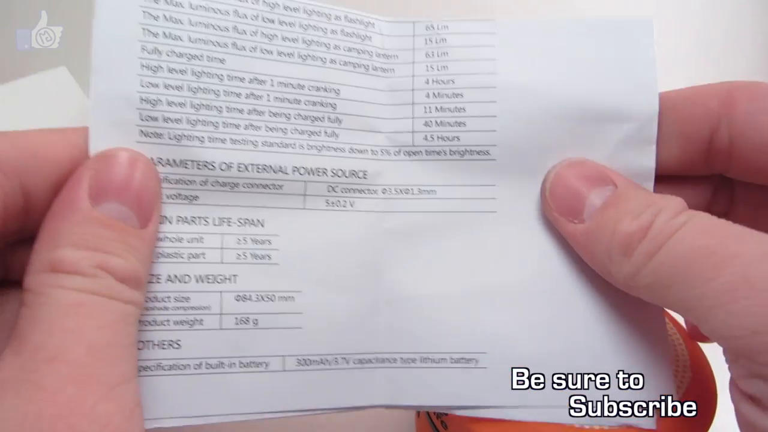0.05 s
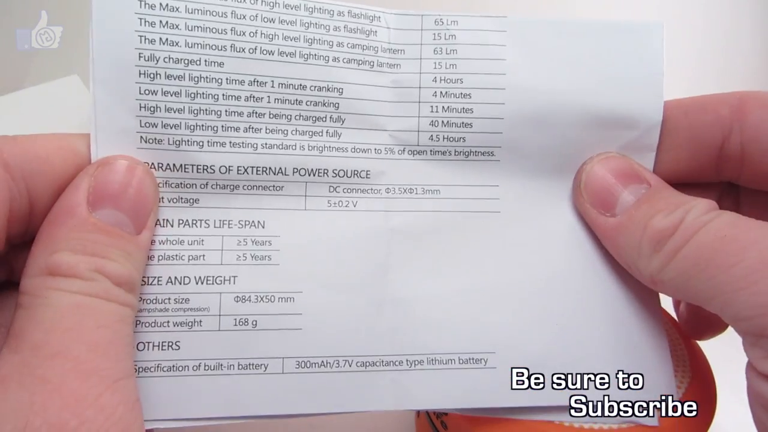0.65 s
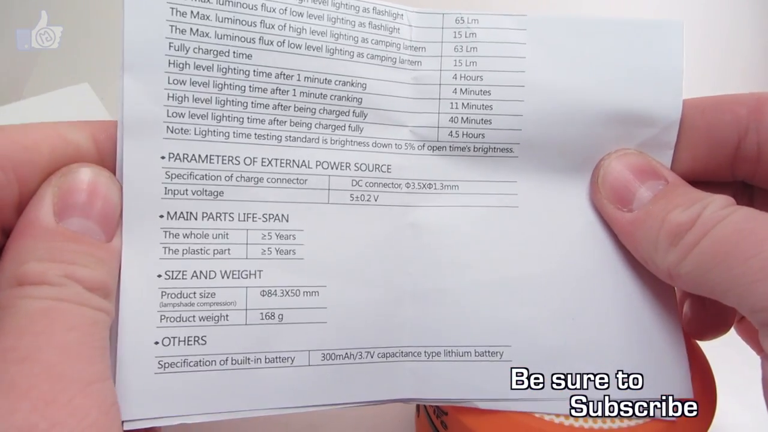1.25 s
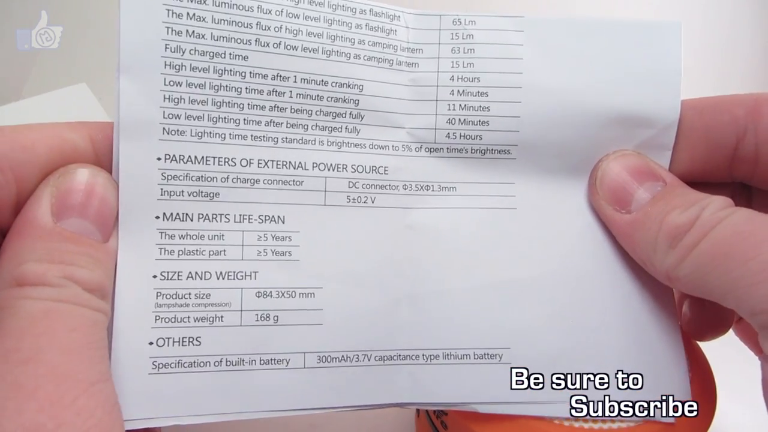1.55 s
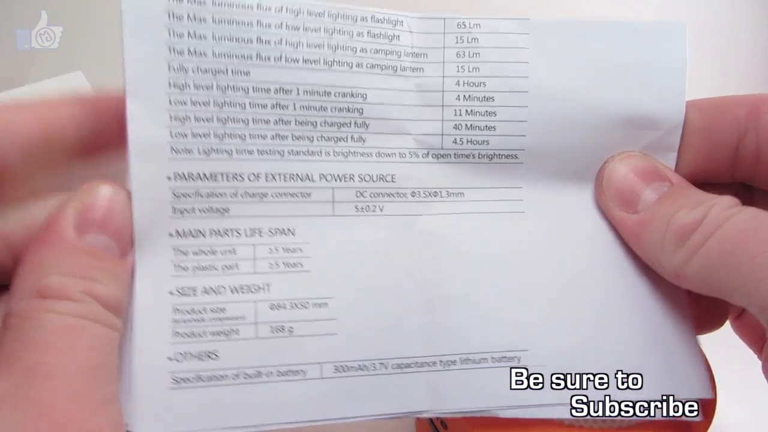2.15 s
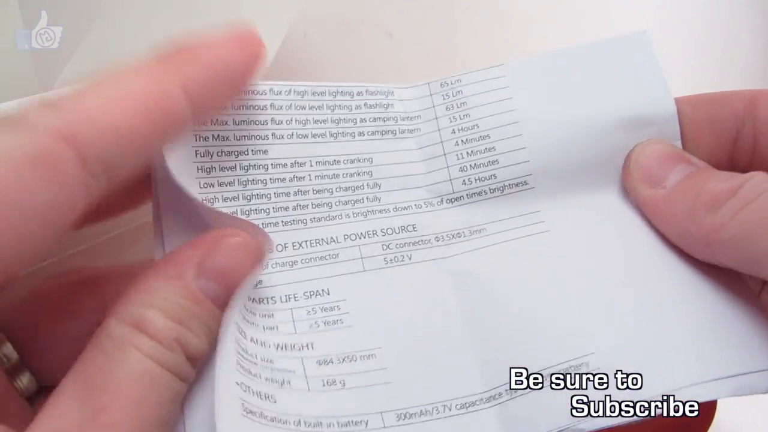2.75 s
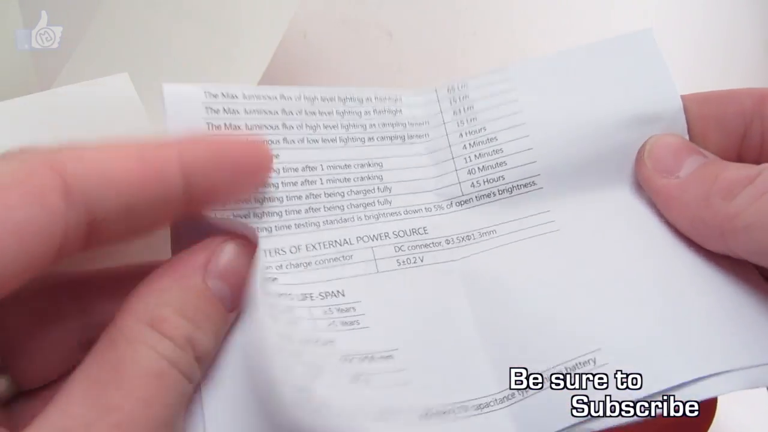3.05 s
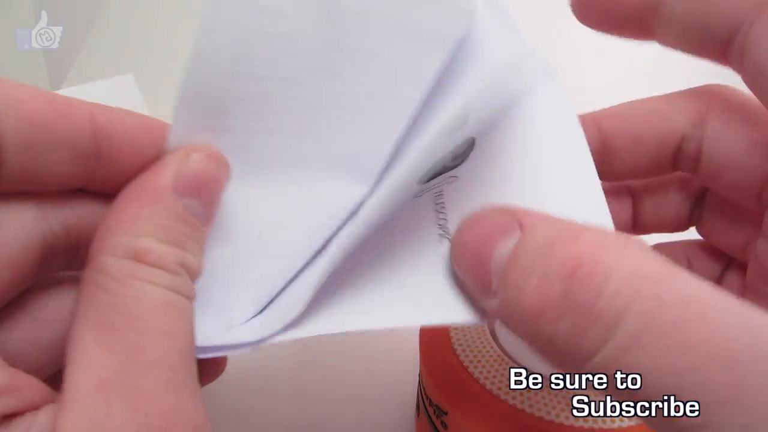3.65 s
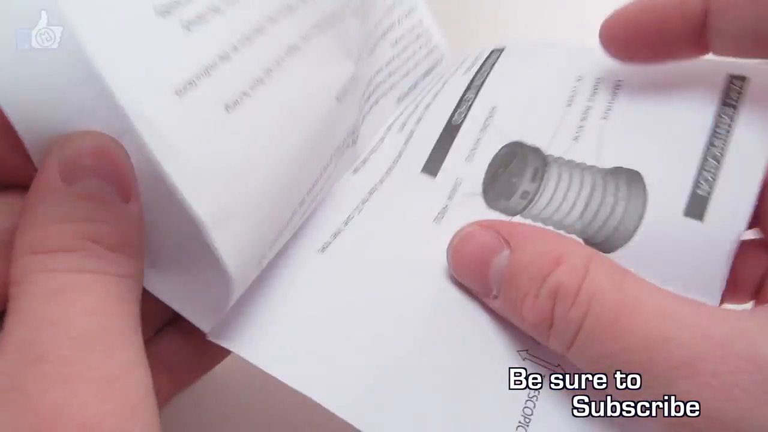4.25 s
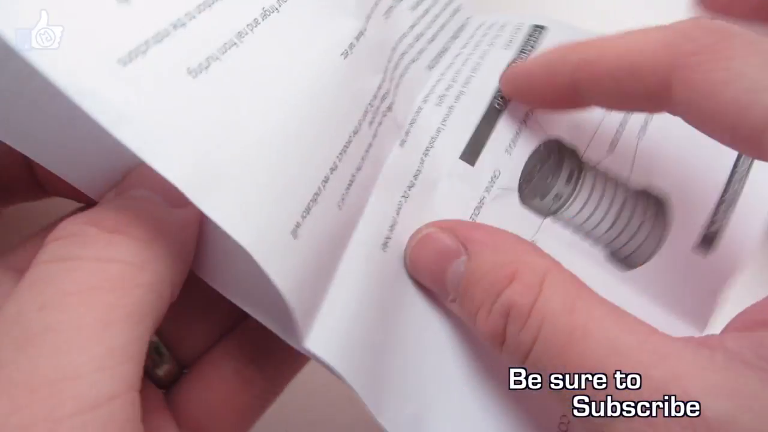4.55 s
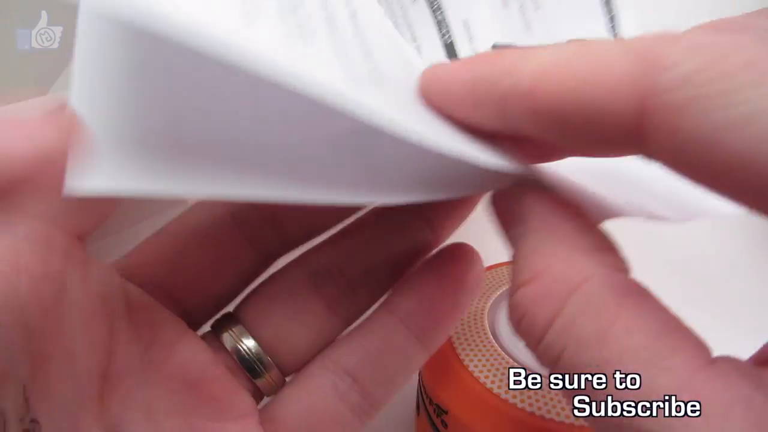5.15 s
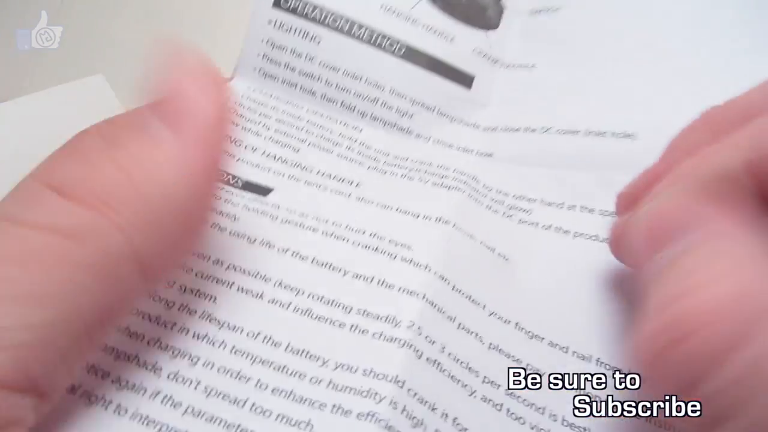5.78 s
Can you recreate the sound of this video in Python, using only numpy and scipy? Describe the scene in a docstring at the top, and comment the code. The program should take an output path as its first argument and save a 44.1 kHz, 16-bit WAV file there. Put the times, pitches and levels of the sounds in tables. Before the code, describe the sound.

Close paper handling: a few faint ticks, then busy crackling and sliding as a folded sheet is unfolded and flipped.

```python
"""A quiet room, close to the microphone: a folded paper leaflet is held, opened out and turned over by hand.
Creases buckle with sharp snaps and fingers touch softly. Each hand movement slides and crinkles layers
of paper that catch on each other, and now and then the sheet flaps, pushing air with a soft thump.
The room returns a faint tail and one late echo over a soft, steady hush."""
import sys
import numpy as np
from scipy import signal
from scipy.fft import rfft, irfft, next_fast_len
from scipy.io import wavfile

SR = 44100
rng = np.random.default_rng(int(sys.argv[2]) if len(sys.argv) > 2 else 0)


def inscribe(sig):
    """Save sig as 16-bit PCM at rate SR to the path in sys.argv[1].

    A 1-D sig is mono; a 2-D sig holds one channel per row.
    Samples are clipped to [-1, 1] before scaling.
    """
    pcm = np.round(np.clip(np.atleast_2d(sig).T, -1, 1) * 32767)
    wavfile.write(sys.argv[1], SR, pcm.astype(np.int16))


N = 261072
TIME = np.arange(N) / SR
FILTER_SIZE = 2048
HZ = np.maximum(np.fft.rfftfreq(FILTER_SIZE, 1 / SR), 1)
BODY_EDGE_HZ, SHEEN_EDGE_HZ = 1700, 6000   # three paper bands: body below, crack between, sheen above
MEDIUM_RUB_DB = -37

# Snaps, touches and catches: t/s, crack level/dB, sheen re crack/dB, panel ring f/Hz, decay/s
PAPER_TRANSIENTS = [(0.02, -43.5, -22, 1100, 0.0052), (0.0584, -34, -18, 2000, 0.00054),
                    (0.233, -47.5, 0, 575, 0.0068), (0.3641, -48.5, 3, 390, 0.0056),
                    (0.4013, -41.5, -5, 1210, 0.00073), (0.6114, -34, -20, 1380, 0.0021),
                    (0.894, -34, -0.5, 1150, .0039), (0.929, -38, -3, 646, 0.011),
                    (0.9404, -29, -10, 580, .0027), (0.9471, -30.5, -37, 1740, .0026),
                    (0.9593, -36, -3, 900, 0.0052), (1.008, -34, -2.5, 840, 0.0083),
                    (1.0498, -41, 3.5, 443, 0.0077), (1.181, -44, -16, 1100, 0.0019),
                    (1.1856, -26, -12, 1300, 0.0023), (1.47, -43, -7.5, 2120, 0.0015),
                    (1.5378, -39, -1.5, 2170, .0029), (1.7364, -40.5, -6, 2060, 0.003),
                    (1.9122, -49.5, -2, 594, 0.0052), (1.9317, -43.5, -4, 2040, .0026),
                    (1.9695, -32.5, -2, 6230, 0.0024), (2.062, -33, 0, 5870, 0.0039),
                    (2.126, -39, -5, 5300, 0.0029), (2.1943, -34, 3.5, 5600, 0.0017),
                    (2.2929, -37, -3, 1300, 0.0062), (2.3009, -22.5, 2, 1400, 0.0048),
                    (2.4, -43, -2, 790, .003), (2.4232, -32.5, -3, 2440, 0.0089),
                    (2.4962, -35.5, 1.5, 1290, 0.03), (2.6063, -15.5, -8, 3650, 0.0017),
                    (2.612, -20.5, 2, 5530, 0.0048), (2.7926, -38.5, -15, 1080, 0.0019),
                    (2.962, -37.5, -5, 636, 0.0049), (3.1143, -27, 6, 5330, 0.0022),
                    (3.1255, -25.5, -1, 1110, 0.0053), (3.2916, -19.5, -2, 5400, 0.0016),
                    (3.5532, -27.5, -22, 2630, .0046), (3.5677, -19.5, -26, 2130, 0.0032),
                    (3.5984, -21, -8.5, 3120, .0042), (3.671, -14, -4.5, 2920, 0.002),
                    (3.6929, -15.5, -3, 2880, 0.0015), (3.7238, -20.5, -1.5, 4450, 0.0051),
                    (3.7887, -33.5, -7, 3400, 0.0023), (4.002, -34, -2.5, 5130, 0.01),
                    (4.165, -34.5, 0, 1700, 0.0065), (4.2988, -30.5, -5.5, 654, 0.0016),
                    (4.3363, -29.5, -29, 1700, 0.002), (4.3542, -36, -12, 3000, 0.0063),
                    (4.3892, -19.5, -10, 1180, 0.0046), (4.4022, -17, -1.5, 4400, 0.0037),
                    (4.639, -33.5, -34, 2980, 0.0029), (4.6464, -33.5, -3, 1260, 0.0032),
                    (4.8399, -35, -15, 600, 0.009), (4.9293, -20.5, -15, 770, 0.0045),
                    (5.0117, -38, -18, 3000, 0.0031), (5.059, -32, -24, 3480, 0.005),
                    (5.0795, -22, -1, 3740, 0.0023), (5.1464, -28, -21, 2778, .0056),
                    (5.1575, -35.5, -30, 1760, 0.0022), (5.208, -36.5, -7, 850, 0.0072),
                    (5.2526, -32.5, -43, 945, 0.0035), (5.3664, -25.5, -4, 660, 0.0078),
                    (5.5948, -29, -2.5, 640, .0043), (5.621, -19.5, -7, 1420, .002),
                    (5.7034, -23.5, -2.5, 985, 0.0048), (5.7377, -39, -9, 440, 0.014)]
def transients():
    """Short paper sounds: sharp crease snaps, soft finger touches and brief catches as a stroke begins."""
    out = np.zeros((2, N))
    for s, db, sheen_db, ring_hz, decay_s in PAPER_TRANSIENTS:
        hit = paper_hit(db, sheen_db, ring_hz, decay_s)
        add(out, s, left_right(hit, pan_db=-1.8, width_db=-0.5))
    return out


def paper_hit(db, sheen_db, ring_hz, decay_s, kick=0.21, tail_db=-24, tail_s=0.0079, leak_hz=260):
    """The paper takes one kick; bending waves scatter over the sheet and quickly die."""
    t = TIME[:2 * FILTER_SIZE]
    # Hard hits are crisper; larger, lower panels have more body.
    body_db = 2.5 - 0.37 * max(db + 33, 0) + 3 * np.log2(1320 / ring_hz)
    ring_db = 8.5 - 0.23 * sheen_db   # a dull hit is a hollow pop
    panel = resonance(ring_hz, 0.4 * ring_hz, ring_db)
    leak = HZ / np.hypot(HZ, leak_hz)   # bass escapes round the edge
    voices = paper_voices(panel * leak * bent_sheet(ripple_db=3))
    sound = 0
    for voice, band_db, stretch in zip(voices, (body_db, 0, sheen_db), (1.1, 1.0, 0.9)):
        envelope = np.exp(-t / (decay_s * stretch)) + from_db(tail_db) * np.exp(-t / tail_s)
        force = fibre_slips(len(t), uneven_db=3) * envelope
        force[0, 0] = kick * np.linalg.norm(force[0])
        sound = sound + radiate(force, voice) * from_db(db + band_db)
    return sound * np.sqrt(SR / 100)   # the energy of 10 ms at that level


# Hand strokes: start t/s, fastest t/s, end t/s, crack level/dB, sheen re crack/dB
HAND_STROKES = [(0.0, 0.029, 0.09, -46.5, 4.5), (0.096, 0.074, 0.18, -54.5, 2.5),
                (0.243, 0.33, 0.33, -48, -1.5), (0.932, 0.95, 0.975, -40, -14),
                (1.047, 1.12, 1.148, -39.5, -0.5), (1.472, 1.482, 1.56, -53.5, -12),
                (2.205, 2.23, 2.34, -37, -0.5), (2.31, 2.34, 2.45, -44, -6), (2.5, 2.583, 2.72, -35.5, -3),
                (2.753, 2.75, 2.78, -41, 1.5), (2.822, 2.827, 2.87, -35, -3.5),
                (2.883, 2.955, 3.0, -34, -2.5), (3.055, 3.176, 3.195, -30, 2),
                (3.164, 3.22, 3.27, -39, -1.5), (3.263, 3.299, 3.425, -33, -4.5),
                (3.462, 3.517, 3.68, -32.5, -2), (3.825, 3.858, 3.895, -46.5, -11),
                (3.932, 3.925, 4.0, -56, 6), (4.012, 4.09, 4.09, -44, -2.5),
                (4.113, 4.106, 4.24, -41.5, -3.5), (4.227, 4.28, 4.38, -38.5, -6.5),
                (4.433, 4.474, 4.515, -39.5, -4.5), (4.53, 4.67, 4.68, -49, -0.5),
                (4.732, 4.766, 4.94, -40.5, -5), (4.84, 4.91, 4.945, -33.5, -2.5),
                (4.94, 5.107, 5.115, -37, -2), (5.13, 5.134, 5.29, -40.5, -5.5),
                (5.293, 5.324, 5.58, -36, -3), (5.56, 5.69, 5.71, -37, 0), (5.714, 5.743, 5.92, -53, 1)]
def hand_strokes(attack_s=0.013, release_s=0.0095, swell_db=6.5):
    """Body, crack and sheen envelopes: each stroke swells to its fastest moment, slackens and stops."""
    power = np.zeros((3, N))
    for start, fastest, end, db, sheen_db in HAND_STROKES:
        slack = np.interp(TIME, [start, fastest, end], [1, 0, 1])
        fade = np.maximum(start - TIME, 0) / attack_s + np.maximum(TIME - end, 0) / release_s
        envelope = from_db(db - swell_db * slack) * np.exp(-np.minimum(fade, 20))
        body_db = -2 - 0.2 * (db - MEDIUM_RUB_DB)   # slower rubbing has more body
        power += np.outer(from_db([body_db, 0, sheen_db]) ** 2, envelope ** 2)
    return np.sqrt(power)


# Top lift that makes rubbing airier than snapping: f/Hz, level/dB
RUB_LIFT = [(8000, 0), (12000, 3), (15500, 3.5)]
def slide(strength, judder_db=1.7, judder_hz=170, ticks_per_s=100, tick_db=2.5, tick_s=0.0013,
          shape_s=0.07):
    """Friction on a bending sheet: fibres slip under a juddering grip while tiny wrinkles tick."""
    grip = from_db(judder_db * drift(judder_hz))
    triggers = rng.random(N) < ticks_per_s / SR
    ticks = triggers * from_db(tick_db * np.minimum(rng.exponential(1, N), 3) - tick_db)
    wrinkles = signal.lfilter([1], [1, -np.exp(-1 / (tick_s * SR))], ticks + 1e-18)
    forces = [rms_one(fibre_slips(N, uneven_db=3) * (grip + tick_share * wrinkles)) * gain
              for gain, tick_share in zip(strength, (3.0, 0.95, 0.7))]
    out, step = np.zeros((2, N)), round(shape_s * SR)
    crossfade = np.hanning(2 * step)
    for at in range(-step, N, step):   # one shape of the sheet melts into the next
        start, end = max(at, 0), min(at + 2 * step, N)
        rub_db = 20 * np.log10(strength[1, start:end].max() + 1e-9)
        lightness_db = np.clip(MEDIUM_RUB_DB - rub_db, -10, 10)
        lift = gain_curve(RUB_LIFT) ** (1 + 0.11 * lightness_db)   # a light touch is airier
        for force, voice in zip(forces, paper_voices(bent_sheet(ripple_db=4) * lift)):
            piece = force[:, start:end] * crossfade[start - at:end - at]
            response = np.array(voice) / np.linalg.norm(voice[0])
            add(out, start / SR, signal.fftconvolve(piece, response, axes=1))
    return left_right(out, pan_db=-1.56, width_db=0.5)


# Edges catching: centre t/s, swell width/s, crack level/dB, body re crack/dB, sheen re crack/dB
EDGE_SCUFFS = [(0.201, 0.0043, -48, 4.5, 3.5), (1.133, 0.0049, -41, -4, 8), (1.144, 0.0024, -36, -3.5, 5.5),
               (2.455, 0.0067, -23.5, -5.5, -9), (2.582, 0.0044, -23, -3, 7.5),
               (2.625, 0.0051, -25, -16, -4), (3.288, 0.0057, -27, -8, -5), (3.566, 0.0037, -27, 3, -6),
               (3.6644, 0.0042, -20.5, -3, -1), (4.0627, 0.0034, -22.5, -5, -10.5),
               (4.29, 0.0025, -23.5, -1, -16), (5.321, 0.0091, -32, -6.5, 2), (5.381, 0.011, -30, -2, -29),
               (5.678, 0.0052, -22.5, -16, -11.5)]
def scuffs():
    """An edge catches and drags: a quick run of slips that swells and fades."""
    out, t = np.zeros((2, N)), TIME[:4 * FILTER_SIZE]
    centre_s = t[-1] / 2
    for s, width_s, db, body_db, sheen_db in EDGE_SCUFFS:
        swell = 1 / np.cosh(np.minimum(np.abs(t - centre_s) / width_s, 20))
        voices = paper_voices(bent_sheet(ripple_db=2.5) * gain_curve(RUB_LIFT))
        for voice, band_db in zip(voices, (body_db, 0, sheen_db)):
            force = fibre_slips(len(t), uneven_db=2) * swell
            sound = radiate(force, voice) * np.linalg.norm(swell)
            add(out, s - centre_s, left_right(sound * from_db(db + band_db)))
    return out


def crinkles(strength, count=170, below_rub_db=8, scatter_db=8):
    """Small creases give way at random, louder the harder the paper is rubbed."""
    out = np.zeros((2, N))
    for k, (jitter, size, octaves) in enumerate(rng.uniform(-1, 1, (count, 3))):
        at = int((k + 0.5 + 0.5 * jitter) * (N - 1) / count)
        rub_db = 20 * np.log10(strength[1, at] + 1e-9)
        db = rub_db - below_rub_db + scatter_db * size
        crinkle = paper_hit(db, sheen_db=-1, ring_hz=2200 * 2 ** octaves, decay_s=0.0055)
        add(out, at / SR, left_right(crinkle))
    return out


# Thumps of the whole sheet: t/s, level before trim/dB, f/Hz
SHEET_FLAPS = [(1.012, -32, 220), (2.3, -29, 190), (2.411, -38, 130), (3.112, -36, 195), (3.269, -19, 179),
               (3.666, -27, 188)]
def flaps(rise_s=0.0017, wobble=0.5, trim_db=-2, leak_hz=110):
    """The sheet pushes a puff of air in a few uneven swings; the deepest air flows round its edge."""
    out, t = np.zeros((2, N)), TIME[:2 * FILTER_SIZE]
    leak = signal.butter(2, leak_hz, "high", fs=SR, output="sos")
    envelope = t / rise_s * np.exp(1 - t / rise_s)
    for s, db, hz in SHEET_FLAPS:
        lowpass = signal.butter(2, 2 * hz, fs=SR, output="sos")
        air = signal.sosfilt(lowpass, rng.standard_normal((2, len(t))))
        swing = np.sin(2 * np.pi * hz * t) + wobble * rms_one(air)
        add(out, s, from_db(db + trim_db) * signal.sosfilt(leak, swing * envelope))
    return out


def fibre_slips(size, uneven_db):
    """Two dense streams of tiny slips of uneven strength, for mid and side."""
    return rng.standard_normal((2, size)) * from_db(uneven_db * np.minimum(rng.exponential(1, size), 6))


# Broad tone of the paper: f/Hz, relative level/dB
PAPER_TONE = [(25, -24.5), (50, -15.5), (130, -21.5), (330, -8.5), (550, -6.5), (800, -3.5), (960, -13.5),
              (1300, -6.5), (1830, -8.5), (2300, 2.5), (5500, 1), (8000, -2.5), (12000, -12.5),
              (15800, -23)]
# Stereo width of the paper: f/Hz, side re mid/dB
PAPER_WIDTH = [(40, -1), (150, 6.5), (600, -24.5), (3000, -12), (7000, -8), (11000, -3.5), (15000, 0.5)]
def paper_voices(shape):
    """Mid and side impulse responses of the sheet in one shape, for body, crack and sheen."""
    above_body, above_crack = (1 / (1 + (edge / HZ) ** 10) for edge in (BODY_EDGE_HZ, SHEEN_EDGE_HZ))
    bands = (1 - above_body, above_body * (1 - above_crack), above_crack)
    colour = gain_curve(PAPER_TONE) * shared_colour() * shape
    gains = [colour * np.sqrt(band) for band in bands]
    return [(causal(gain), causal(gain * gain_curve(PAPER_WIDTH))) for gain in gains]


def bent_sheet(ripple_db, spacing_hz=260, even_above_hz=7000):
    """Each bend gives the sheet its own peaks and dips, which even out in the treble."""
    knots = rng.standard_normal(FILTER_SIZE)
    depth_db = ripple_db / (1 + (HZ / even_above_hz) ** 4)
    return from_db(depth_db * np.interp(HZ / spacing_hz, np.arange(len(knots)), knots))


def radiate(force, voice):
    """The sheet turns a force into mid and side sound; the mid has energy 1."""
    sound = np.array([through(drive, response) for drive, response in zip(force, voice)])
    return sound / np.sqrt(np.sum(sound[0] ** 2) + 1e-20)


# Steady resonances: f/Hz, width/Hz, level/dB
STEADY_RESONANCES = [(646, 108, 8.5), (1109, 170, 9.5), (2039, 110, 8), (2953, 160, 4), (4500, 370, -1.5),
                     (5170, 930, 2.5)]
def shared_colour():
    """The resonances that colour both paper and room tone, as gain at HZ."""
    return np.prod([resonance(*mode) for mode in STEADY_RESONANCES], axis=0)


def reflections(x, t60_s=0.22, echo_s=0.0632, smear_s=0.0022):
    """The walls return a weak, dark diffuse tail and one smeared echo from the far side."""
    t = TIME[:SR // 2]
    walls = causal(gain_curve([(100, 15), (1200, -2), (5000, -10), (15000, -9)]))
    out = []
    for channel in x:
        tail = rng.standard_normal(len(t)) * from_db(-60 * t / t60_s) * (t > 0.005)
        echo = rng.standard_normal(len(t)) * np.exp(-np.abs(t - echo_s) / smear_s) * (t > echo_s)
        response = from_db(-22) * tail / np.linalg.norm(tail) + from_db(-28) * echo / np.linalg.norm(echo)
        out.append(through(channel, through(response, walls)))
    return np.array(out)


# Hush of the room: f/Hz, relative level/dB
ROOM_HUSH = [(25, -3.5), (60, 0.5), (200, -2), (450, -3.5), (700, -1.5), (950, -5.5), (1200, -1),
             (1800, -4.5), (3000, -8), (7000, -13), (15500, -20)]
def room_tone(level_db=-54.5, side_db=-5):
    """The room's air lays a soft, steady bed of noise under the paper."""
    response = causal(gain_curve(ROOM_HUSH) * shared_colour())
    mid, side = (rms_one(through(white, response)) for white in rng.standard_normal((2, N)))
    return from_db(level_db) * left_right((mid, side), width_db=side_db)


def from_db(db):
    """Decibels to gain."""
    return 10 ** (np.asarray(db) / 20)


def rms_one(x):
    """Scale to rms 1."""
    return x / np.sqrt(np.mean(x ** 2) + 1e-20)


def drift(rate_hz):
    """A random wander, gliding to a new value rate_hz times a second."""
    knots = rng.standard_normal(8192)
    return np.interp(TIME * rate_hz, np.arange(len(knots)), knots)


def resonance(hz, width_hz, db):
    """One EQ bell as gain at HZ."""
    return from_db(db / (1 + (2 * (HZ - hz) / width_hz) ** 2))


def gain_curve(points):
    """An EQ curve through (f/Hz, level/dB) points on a log axis, as gain at HZ."""
    hz, db = np.transpose(points)
    return from_db(np.interp(np.log(HZ), np.log(hz), db))


def causal(gain):
    """Minimum-phase impulse response with this gain: no pre-ring."""
    cepstrum = irfft(np.log(gain + 1e-6))
    cepstrum[1:FILTER_SIZE // 2] *= 2
    cepstrum[FILTER_SIZE // 2 + 1:] = 0
    return irfft(np.exp(rfft(cepstrum)))


def through(x, response):
    """Filter one channel, keeping its length."""
    return signal.oaconvolve(x, response)[:len(x)]


def left_right(sound, pan_db=0, width_db=0):
    """Mid and side to left and right; negative pan leans right."""
    mid, side = sound[0], sound[1] * from_db(width_db)
    return np.array([(mid + side) * from_db(pan_db / 2), (mid - side) * from_db(-pan_db / 2)])


def add(out, s, sound):
    """Mix a two-channel sound in at s seconds."""
    at = max(0, round(s * SR))
    out[:, at:at + sound.shape[1]] += sound[:, :max(0, N - at)]


# Bassy when held taut, thin and hollow when hanging open: t/s, bass level/dB, hollow level/dB
UNFOLDING_TONE = [(1.0, 6, -7), (3.7, -1.5, -2.5), (4.3, 0.5, 0), (4.9, -3.5, 3), (5.8, 1, 4)]
def scene(bass_hz=480, hollow_hz=620, hollow_q=10):
    """The handled leaflet in its room; rubbing feeds the hollow resonance of the open sheet."""
    strength = hand_strokes()
    rubbing = scuffs() + slide(strength)
    paper = transients() + crinkles(strength) + rubbing
    times, *levels_db = np.transpose(UNFOLDING_TONE)
    bass_gain, hollow_gain = (from_db(np.interp(TIME, times, db)) for db in levels_db)
    bass = signal.sosfilt(signal.butter(1, bass_hz, fs=SR, output="sos"), paper)
    hollow = signal.lfilter(*signal.iirpeak(hollow_hz, hollow_q, fs=SR), rubbing)
    leaflet = paper + (bass_gain - 1) * bass + (hollow_gain - 1) * hollow + flaps()
    return leaflet + reflections(leaflet) + room_tone()


# The left microphone port is weaker, most of all in the bass: f/Hz, left re right/dB
PORT_BALANCE = [(60, -6), (170, -5), (400, -5), (1200, -3.5), (2800, -1), (6000, -1.5), (10000, -2.5),
                (15000, -1)]
# The right port trails in the low range: f/Hz, phase lag/rad
PORT_LAG = [(60, 1), (400, 0.81), (1200, 0.61), (4000, 0.01)]
def record(dry, ceiling=0.87, cutoff_hz=16000):
    """A microphone with two unequal ports; the highest peaks are rounded and the top end is cut."""
    ratio = gain_curve(PORT_BALANCE)
    ports = np.array([through(x, causal(2 * gain / (1 + ratio))) for x, gain in zip(dry, (ratio, 1))])
    size = next_fast_len(N + FILTER_SIZE)
    lag = np.interp(np.fft.rfftfreq(size, 1 / SR), *np.transpose(PORT_LAG))
    ports[1] = irfft(rfft(ports[1], size) * np.exp(-1j * lag), size)[:N]
    rounded = ceiling * np.tanh(ports / ceiling)
    return signal.sosfilt(signal.ellip(10, 0.1, 70, cutoff_hz, fs=SR, output="sos"), rounded)


dry = scene()
out = record(dry)
inscribe(out)
```